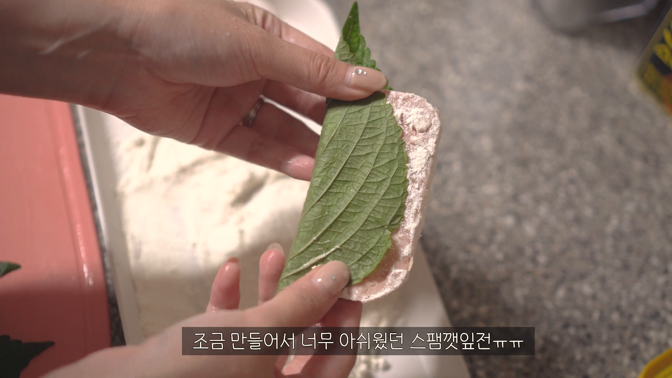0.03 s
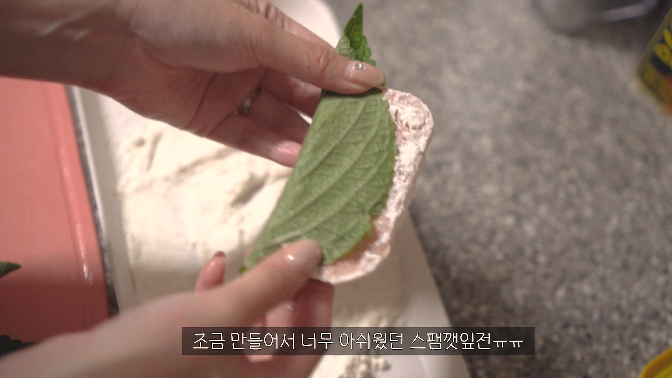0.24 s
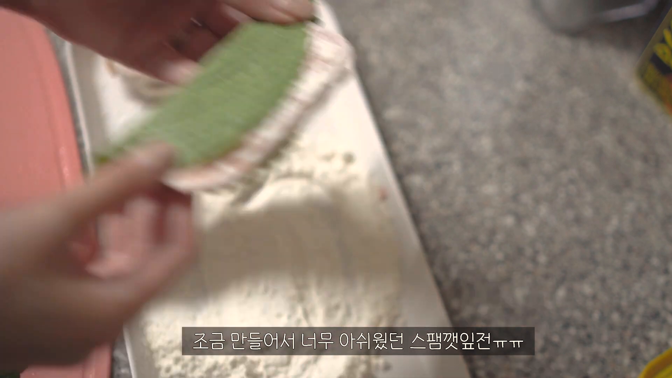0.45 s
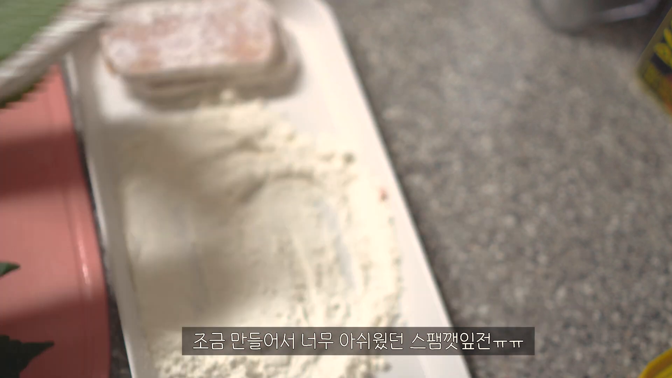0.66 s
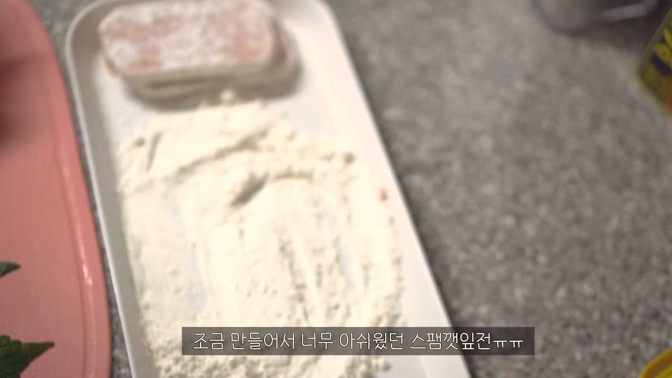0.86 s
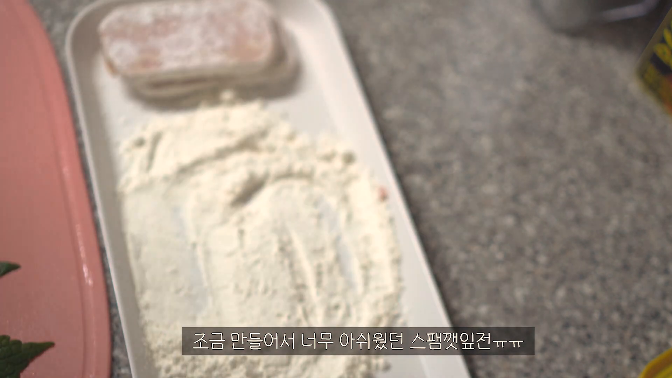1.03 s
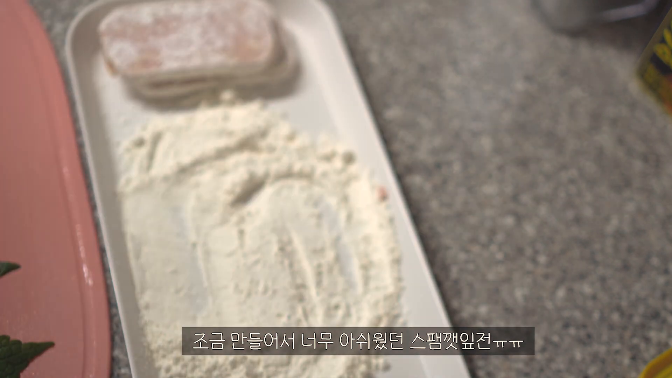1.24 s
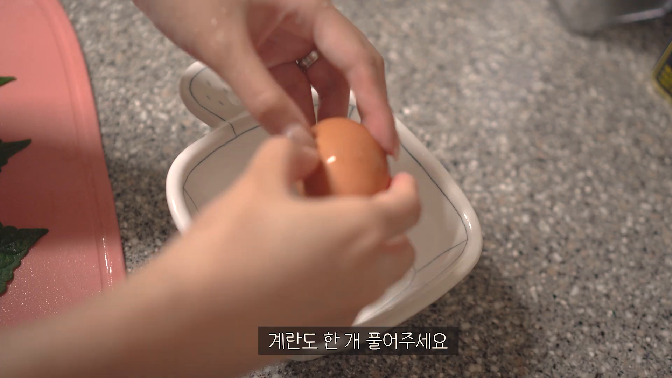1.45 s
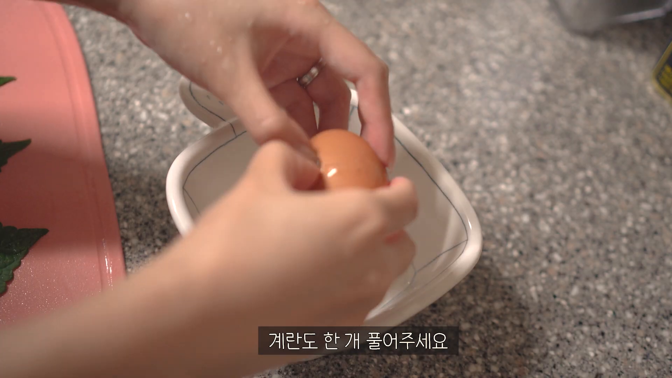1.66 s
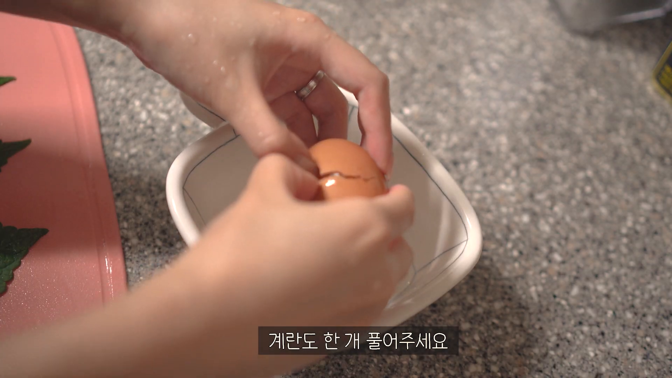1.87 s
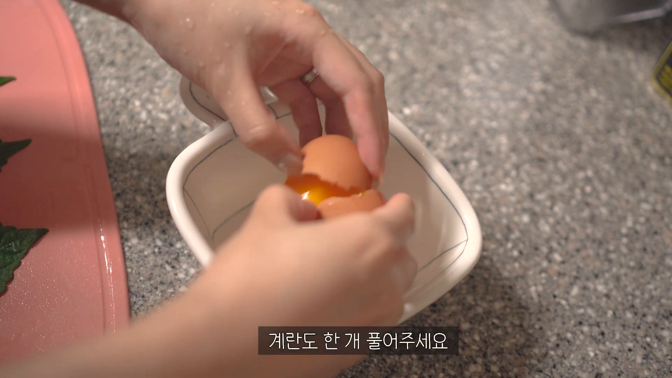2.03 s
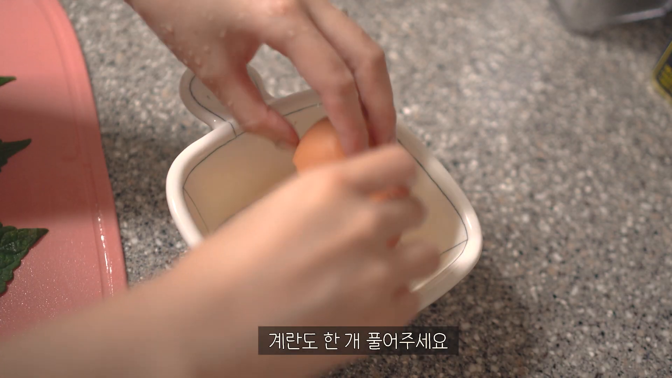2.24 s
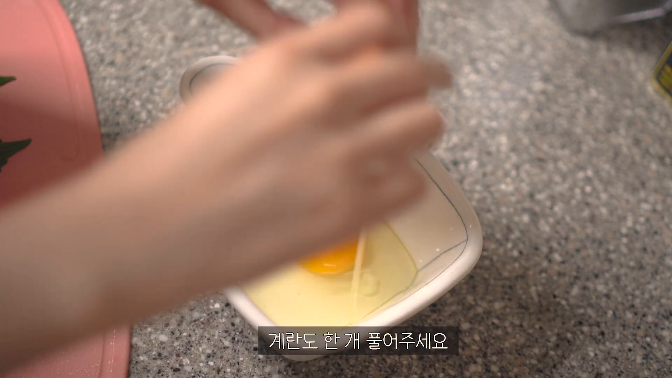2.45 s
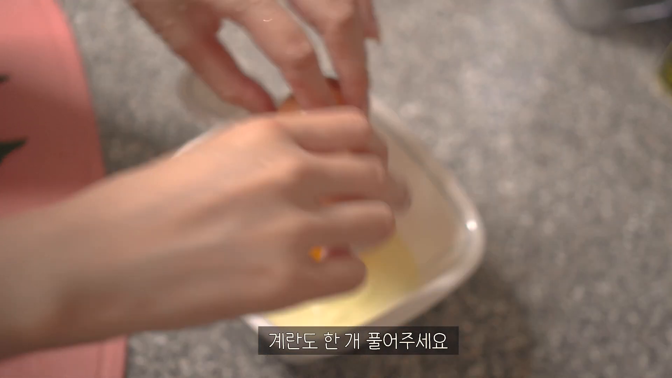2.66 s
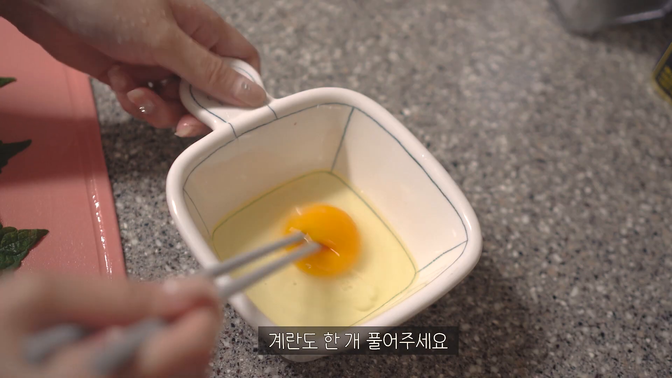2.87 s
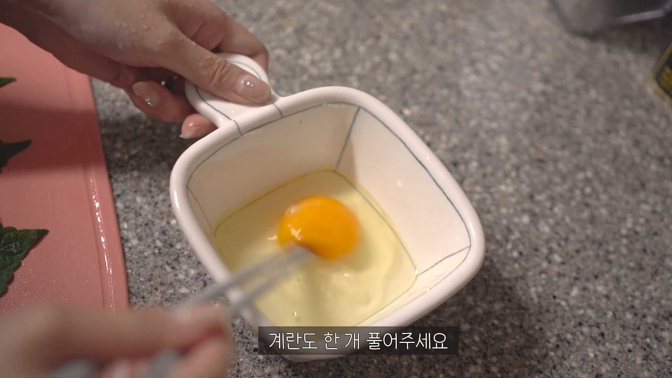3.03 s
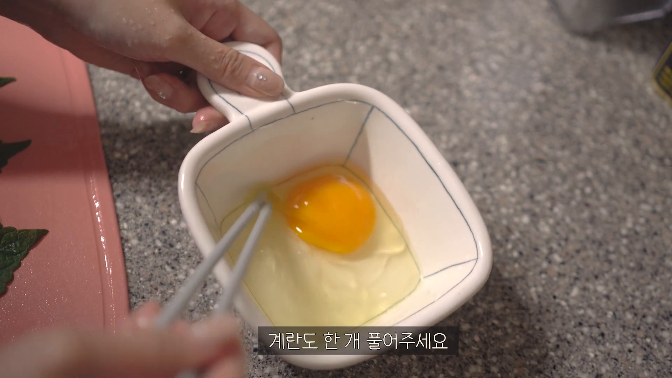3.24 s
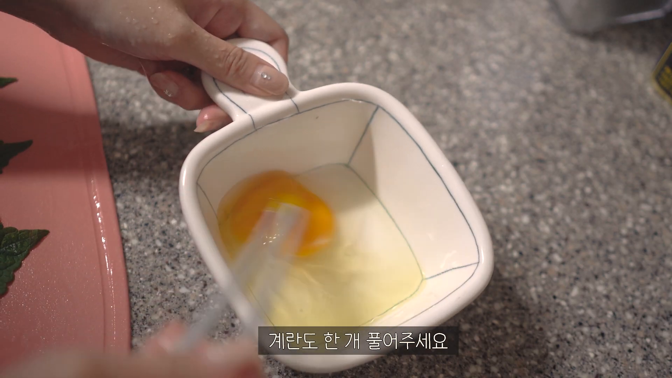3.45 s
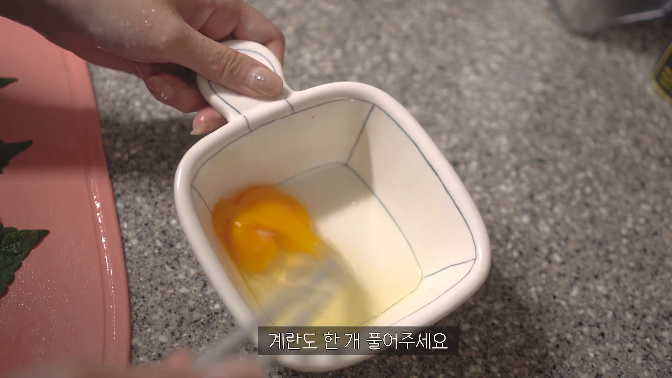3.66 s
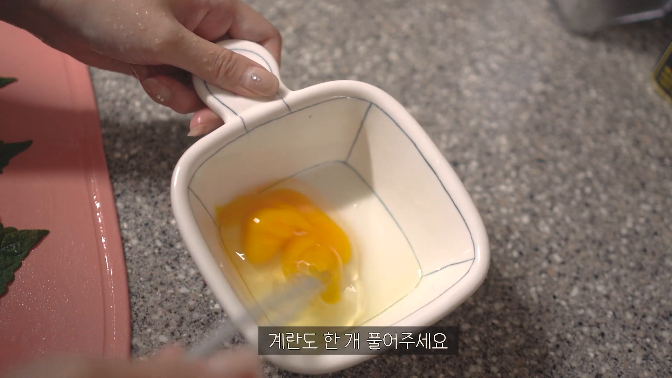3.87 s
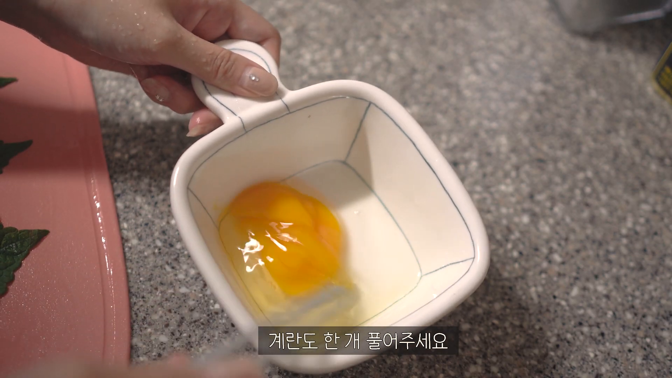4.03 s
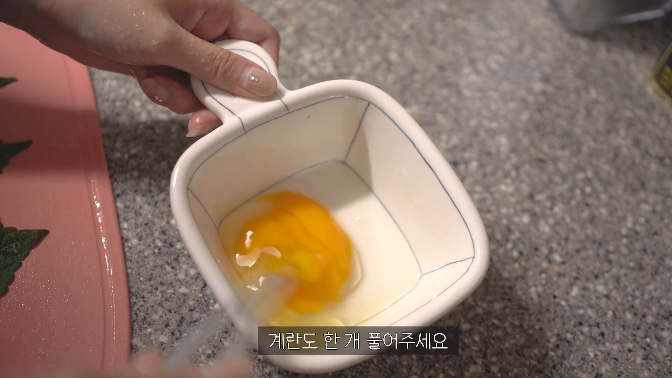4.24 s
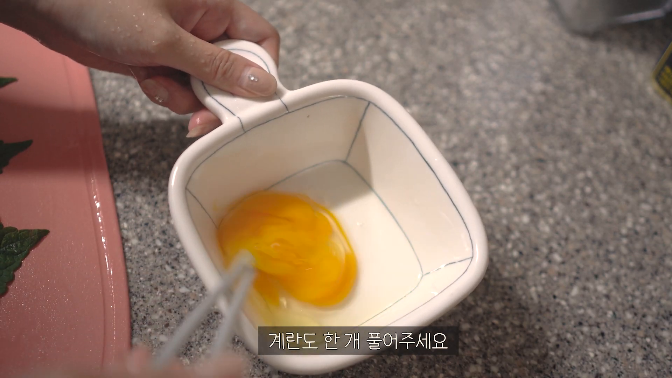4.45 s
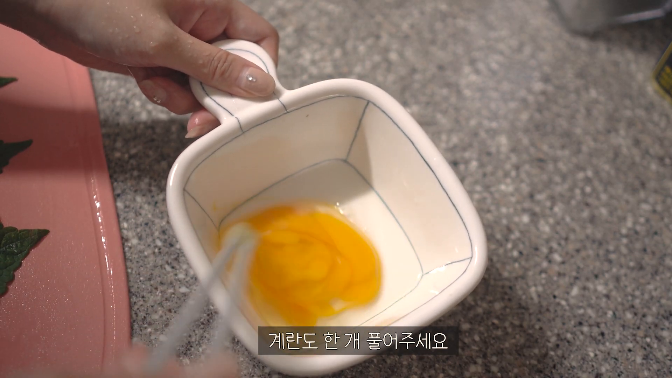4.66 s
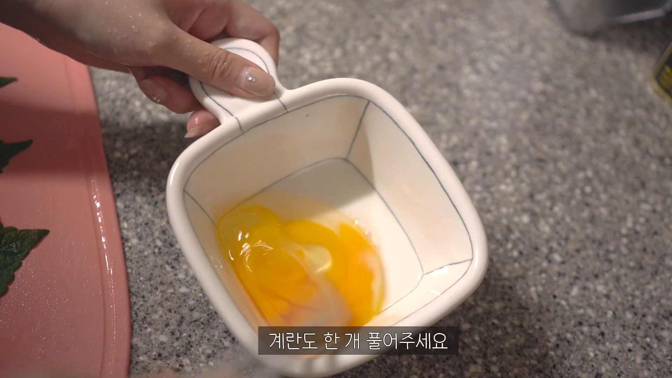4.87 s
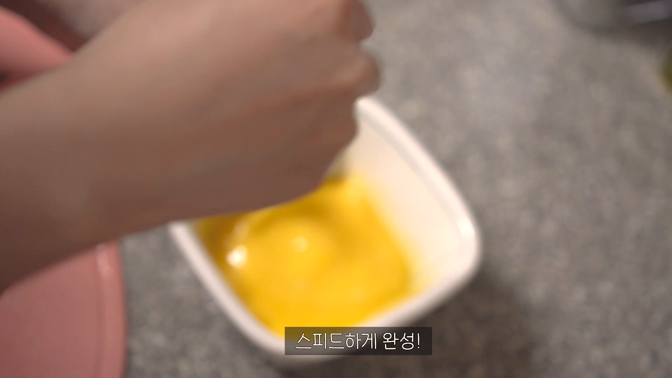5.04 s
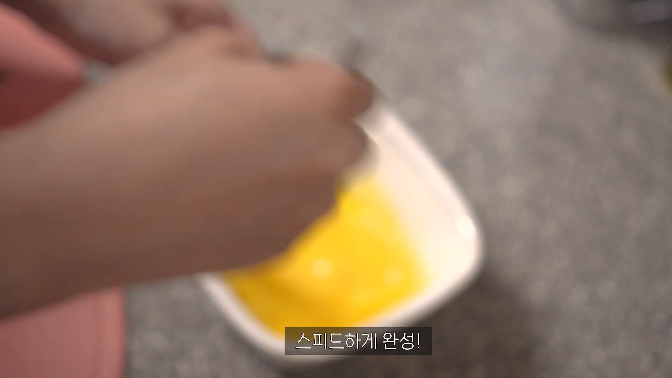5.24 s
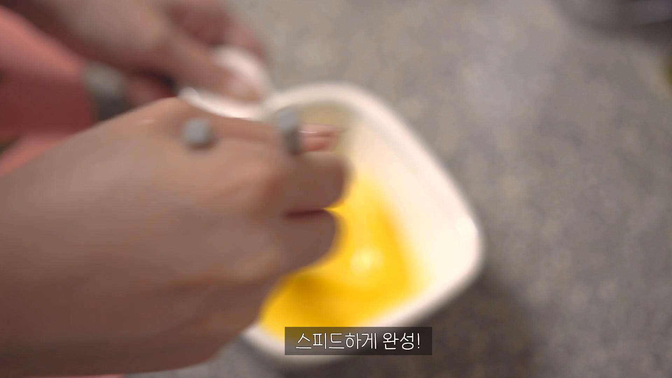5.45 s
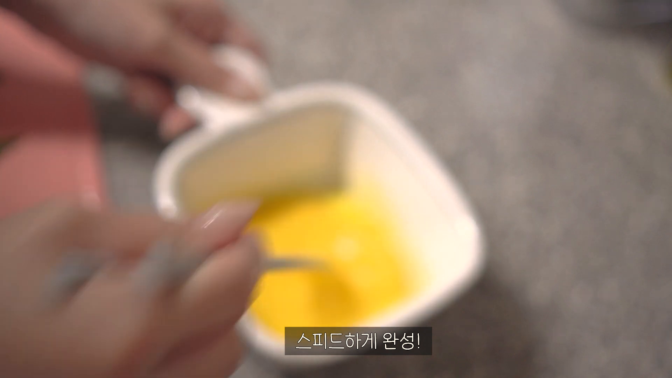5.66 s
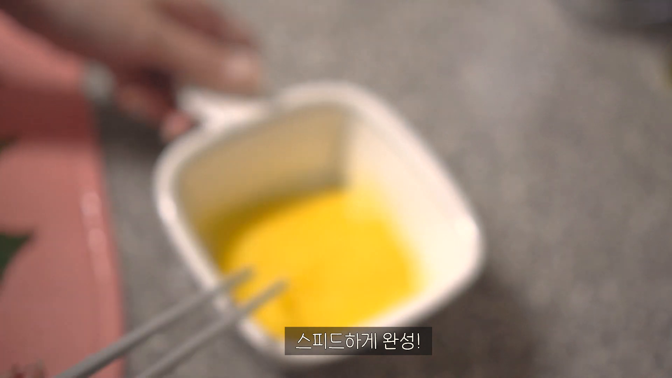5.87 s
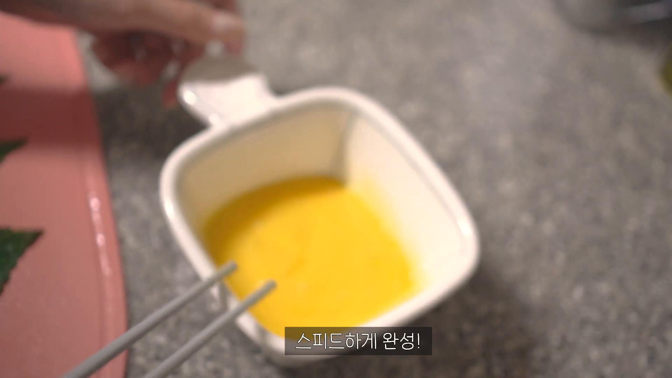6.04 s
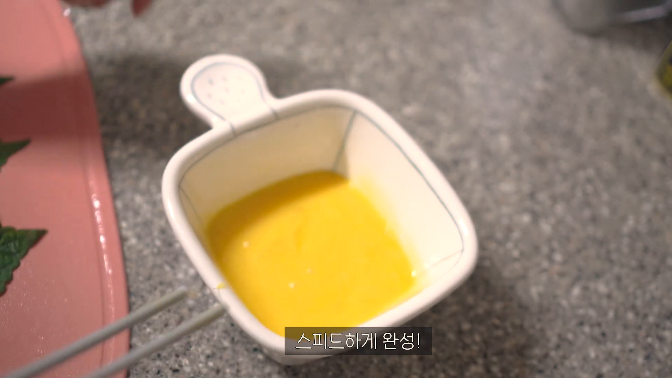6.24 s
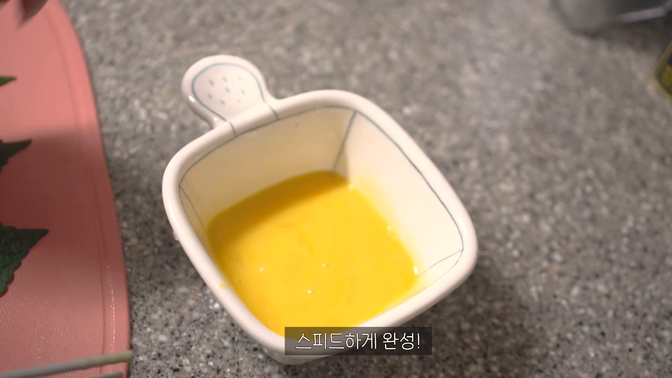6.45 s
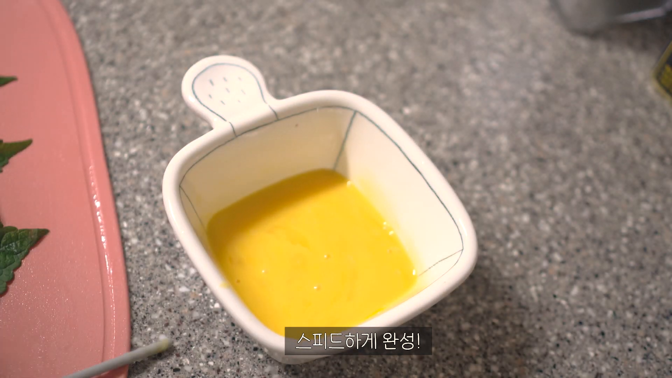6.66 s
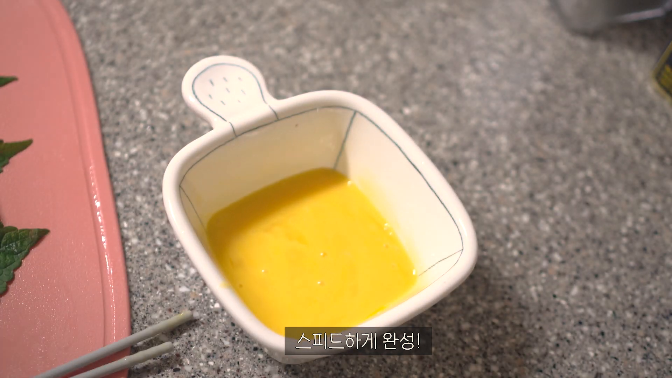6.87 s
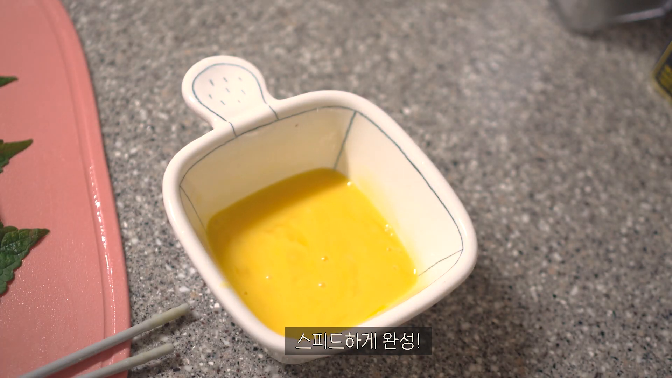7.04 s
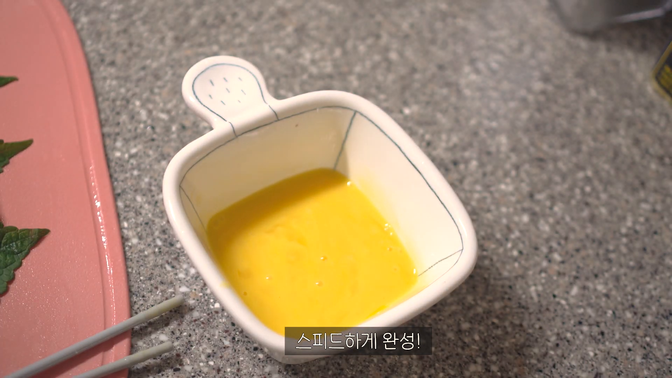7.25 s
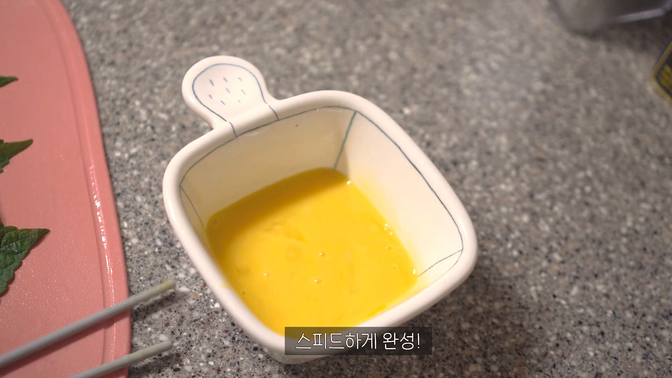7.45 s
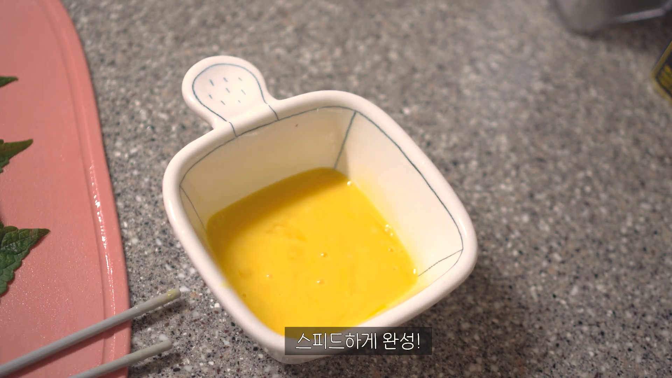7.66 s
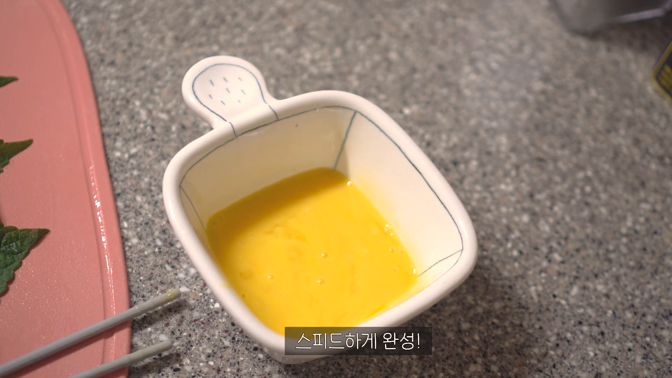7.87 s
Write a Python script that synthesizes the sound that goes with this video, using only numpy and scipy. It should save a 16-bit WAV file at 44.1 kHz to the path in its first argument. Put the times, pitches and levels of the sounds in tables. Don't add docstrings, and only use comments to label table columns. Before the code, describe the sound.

Close stereo in a small hard kitchen with a steady fan. Light taps on a floured tray, then an eggshell snaps sharply and crackles apart. An abrupt cut brings chopsticks beating egg in a ceramic dish, which knocks dully on the hollow counter with thin clinks and wet smacks. Drips follow, the dish is set down rocking, and sticks clatter onto stone.

```python
import sys
import numpy as np
from scipy import signal
from scipy.io import wavfile
from scipy.ndimage import uniform_filter1d

SR = 44100
rng = np.random.default_rng(int(sys.argv[2]) if len(sys.argv) > 2 else 0)


def nominal_scale(level):
    x = np.asarray(level, float) / 20
    return 10 ** x


def bounce(signal):
    frames = np.transpose(np.atleast_2d(signal))
    limited = np.clip(frames, -1, 1)
    pcm = np.round(limited * 32767).astype(np.int16)
    wavfile.write(sys.argv[1], SR, pcm)


N = 348717

# (frequency [Hz], density [dB per Hz])
FAN_SPECTRUM = [(15, -84), (25, -48), (288, -7.5), (524, -6), (1090, -3), (1220, -7), (1640, 0), (2210, -7),
                (2670, -7.5), (3810, -9), (15200, -17), (16500, -25)]
# (frequency [Hz], width [Hz], lift [dB])
DUCT_HUMPS = [(319, 35, 4.5), (1070, 420, 9), (1600, 97, -4), (2450, 360, 8.5)]
# (time [s], level [dB])
FAN_LEVEL = [(0, -59), (1.38, -57.5), (1.40, -59), (2.8, -55), (2.83, -58.5), (5.6, -57), (6.5, -58),
             (7.92, -56)]
# (frequency [Hz], likeness [0-1])
FAN_LIKENESS = [(60, 0.98), (180, 1), (550, 0.07), (1650, 0.24), (4970, 0.11), (15000, 0.24)]
# (start [s], duct humps [factor], bass [dB])
SCENES = [
    (0, 0.5, 6),
    (1.39, 0.9, 0),
    (2.81, 1.05, 15),
    (5.9, 1.13, 9),
]
# (start [s], length [s], frequency [Hz], lift [dB])
DISH_HOLLOW = [
    (5.42, .2, 1200, 9),
    (5.62, .32, 1620, 13),
    (5.66, .26, 1200, 5),
    (5.73, .12, 2600, 5),
    (7.78, .2, 1600, 11),
    (7.76, .2, 2500, 5),
]
HOLLOW_WIDTH_HZ = 150
# (frequency [Hz], t60 [s])
ROOM_DECAY = [(200, 0.52), (530, 0.25), (1400, 0.18), (3700, 0.18), (9700, 0.19), (16000, 0.13)]
# (time [s], level [dB])
CRUMBS = [
    [(1.94, -67), (1.98, -48), (2.05, -52), (2.24, -52), (2.35, -52), (2.4, -56), (2.49, -52), (2.54, -50),
     (2.58, -58), (2.65, -54), (2.72, -54), (2.81, -60)],
    [(3.55, -63), (3.706, -67.5), (4.3, -64), (4.7, -58), (4.82, -62), (5.2, -66)],
]
# (time [s], level [dB], bright edge [Hz], chatter [s])
STICKS_LAID = [
    (5.001, -35, 2040, .008),
    (6.615, -27, 1510, 0.012),
    (6.791, -31, 2100, 0.0088),
    (6.835, -14.5, 3400, 0.012),
    (6.846, -23, 4300, .012),
    (6.881, -17.5, 2800, 0.014),
]
# (time [s], first mode [dB], second re first [dB], third re first [dB])
CLINKS = [(2.9312, -61, -18, -15), (3.112, -48, -29, -13), (3.2934, -43.5, -22, -28),
          (3.609, -45.5, 4.5, 4), (3.7978, -63, -5, 0), (3.973, -55, -14, -8), (4.0357, -41.5, -13, -2.5),
          (4.133, -54, -17, -8), (4.1924, -54, -15, -18), (4.3064, -59, -16, -5), (4.366, -50.5, -12, -24),
          (4.5346, -60.5, -6, -5), (4.677, -59, -6, 12.5)]
# (frequency [Hz], level [dB], t60 [s])
STICK_MODES = [(4581, 0, 0.06), (5820, 4, 0.037), (6030, 13, 0.02), (8170, 0, 0.023), (8400, -2, .05)]
# (time [s], spray [dB], spray centre
# [Hz], bubble [Hz], bubble [dB])
WET_SMACKS = [(3.550, -19.5, 3240, 1212, -17.5), (3.551, -23.5, 11900, 2320, -24),
              (3.61, -31.5, 8800, 6250, -48.5), (3.697, -22, 5000, 4900, -38), (3.785, -39.5, 7000, 2500, -58),
              (3.808, -35, 2960, 3110, -39.5), (3.866, -31, 4500, 1136, -24), (4.026, -38, 4030, 1110, -33),
              (4.037, -24, 5500, 2780, -31), (4.192, -42, 4480, 1060, -29.5), (4.211, -44, 8500, 3770, -53),
              (4.329, -44, 4000, 3380, -43.5), (4.368, -41, 4000, 1600, -37.5), (4.483, -37, 7000, 4100, -47),
              (4.654, -37, 5400, 5100, -42), (4.676, -41, 9000, 2450, -38.5), (4.727, -39, 5860, 5620, -43.5),
              (4.785, -40, 4230, 1230, -40), (4.875, -41, 8900, 7960, -44.5), (5.070, -39, 6000, 4100, -45.5),
              (5.333, -43.5, 13000, 13000, -50), (5.380, -35, 12300, 5070, -56),
         (5.508, -25, 14400, 11100, -40.5), (5.601, -29, 3470, 1550, -22), (5.622, -30, 14000, 5820, -46),
         (5.749, -29.5, 13000, 11900, -48), (6.615, -39, 7000, 1070, -29.5), (6.790, -49, 4000, 2400, -55),
         (6.839, -53, 7000, 2300, -30), (6.976, -37.5, 12000, 11000, -47), (7.443, -37.5, 4270, 2000, -47)]
BUBBLE_T60_S, YOLK_T60_S = 0.045, 0.16

# (frequency [Hz], density [dB per Hz])
SNAP_SPECTRUM = [(240, -64), (400, -35), (1050, -27), (1620, -34.5), (1960, -19), (2250, -19.5),
                 (12500, -18), (15500, -21), (17000, -45)]
# (time [s], snap level [dB])
HANDLING = [
    (0.7876, -35),
    (0.915, -51),
    (0.9264, -45),
    (0.954, -45),
    (0.9644, -45),
    (1.3828, -44),
]
TRAY_HZ, TRAY_DB, TRAY_TILT_DB = 2000, -19, -3
# (time [s], snap [dB], ring [Hz], ring re
# snap [dB])
SHELL_SNAPS = [(1.484, -50, 3380, -14), (1.5336, -36, 2200, -4), (1.5957, -29.5, 1820, -24),
               (1.6337, -37, 2600, -13), (1.6495, -11, 2090, -30), (1.656, -13.5, 1964, -17.5),
               (1.8169, -26, 1730, -35), (1.8584, -35, 2230, -47), (1.8696, -27, 2450, -41),
               (1.9647, -47, 3330, 0), (1.9789, -33, 3300, -4), (1.9868, -4.5, 2960, -22),
               (2.0025, -7.5, 2300, -19), (2.0197, -19, 2610, -10),
               (2.0864, -28, 3720, -13), (2.0963, -36.5, 2000, -0.5), (2.1136, -27.5, 1977, 6.5),
           (2.1284, -53, 2010, 21), (2.2177, -19.5, 3345, -7.5), (2.2746, -38, 2030, -3),
           (2.3433, -41.5, 1790, 4.5), (2.387, -39.5, 3020, -1), (2.4191, -30, 2110, -6),
           (2.462, -30.5, 2960, 1), (2.492, -26, 2090, -4.5), (2.504, -26, 2160, -5.5),
           (2.5177, -25, 2160, -11), (2.6013, -26, 3210, -28), (2.648, -24, 1970, -16),
           (2.6637, -22.5, 1930, -9), (2.688, -38.5, 3150, -1), (2.7748, -30, 2165, -8),
           (2.804, -45, 2450, -4)]
CRACKLE_S, CRACKLE_S_PER_DB = 0.003, 0.00018
EVEN_RING_DB, DULL_PER_DB = -18, 0.11
CUT_S = 2.812

# (frequency [Hz], level [dB], t60 [s])
HOLLOW_MODES = [(118, -9, .07), (194.3, 0, .14), (250, -7, .08), (300, -4, .1), (358, -1, .17)]
# (frequency [Hz], level [dB], t60 [s])
LOW_MODES = [(420, -2, .1), (469, 6, .14), (510, 3, .15), (556, 4, .15), (620, 3, .15), (686, 5, .17)]
# (frequency [Hz], level [dB], t60 [s])
HELD_MODES = [(805, -8, .12), (858, -6, .2), (905, -2, .13), (1060, 5, .1), (1110, 5, .1), (1220, 0, .1),
              (1277, -4, .1), (1394, -2, .2), (1466, -4, .2)]
# (frequency [Hz], level [dB], t60 [s])
FREED_MODES = [(856, -2, .2), (910, -1, .17), (1040, -7, .15), (1087, -5, .2), (1220, -5, .15),
               (1281, -8, .17), (1390, -6, .17), (1470, -1, .17), (1540, -9, .2), (1685, -9, .2),
               (1781, -2, .1), (1975, -16, .15)]
# (frequency [Hz], level [dB])
CLACK_SPECTRUM = [(1000, -53), (1700, 4), (2500, -4.5), (3500, -25), (6000, -32), (16000, -44.5)]
# (time [s], level [dB], sharpness [dB], bass [dB])
WHISK = [(2.928, -43, -6, -4), (2.993, -24, 0, -8), (3.03, -32, -3, -4), (3.11, -28, -13, -14),
         (3.168, -42, -7, -8), (3.292, -32, -10, -18), (3.457, -38, -13, -12), (3.47, -34, -15, -14),
         (3.611, -33, -10, -12), (3.683, -43, 4, -8), (3.707, -45, 3, -9), (3.797, -32, -11, -12),
         (3.839, -42, 3, -9), (3.97, -27, -13, -16), (4.022, -36, -6, -12), (4.129, -27, -9, -14),
         (4.191, -32, -8, -14), (4.307, -31, -13, -14), (4.362, -35, -2, -12), (4.485, -23, -12, -16),
         (4.529, -38, 0, -12), (4.658, -32, -14, -12), (4.7, -33, -8, -14), (4.832, -30, -11, -9),
         (4.875, -39, -8, -9), (5.013, -30, -16, -12), (5.05, -36, -12, -8), (5.11, -39, -8, -3),
         (5.169, -39, -6, -4), (5.366, -40, -7, -1)]
# (time
# [s], level [dB], sharpness [dB], bass [dB], rattle [s])
SET_DOWN = [(5.92, -23, 5, -11, .008), (5.929, -24, 4, -11, .025), (5.96, -28, 0, -8, .03),
            (6.083, -27, 3, -9, .008), (6.093, -25, 7, -13, .012), (6.132, -20, -1, -15, .02),
            (6.22, -40, 2, -8, .03), (6.616, -32, -7, -14, .015), (6.669, -36, -5, -9, .009),
            (6.746, -42, -9, -9, .012), (6.837, -34, -9, -14, .015), (6.882, -33, -9, -14, .02),
            (7.061, -43, -4, 0, .029), (7.636, -40, 0, -12, .013)]
WHISK_RATTLE_S = 0.015
WHISK_LASTING, SET_LASTING = 0.48, 0.45
# (at sharpness 0 [dB], growth [dB per dB of sharpness])
WHISK_CLACK, SET_CLACK = (-13, 1.05), (-16, 0.3)
# (time [s], frequency [Hz], level [dB], t60 [s])
SHELL_RINGS = [(1.650, 1058, -42, .078), (2.006, 1014, -52, .09), (2.114, 1036, -37.5, .075),
               (2.116, 830, -38, .025), (2.128, 1036, -35.5, .072), (2.218, 2030, -24.5, .023),
               (2.328, 1800, -46, .03), (2.458, 3600, -38, .03), (2.505, 3100, -38, .06),
               (2.519, 2100, -32, .04), (2.642, 2000, -44, .04), (2.7, 3080, -47, .07)]
# (time [s], frequency [Hz], level [dB], t60
# [s])
RUB_RINGS = [
    (3.01, 1394, -36, .2),
    (3.706, 860, -34, .045),
    (4.536, 1460, -43, .06),
    (4.706, 1440, -44, .06),
    (4.878, 1450, -49, .05),
    (5.048, 1453, -50, .05),
    (5.112, 358, -50, .2),
    (5.18, 345, -50, .15),
    (5.386, 350, -49, .12),
]
# (time [s], frequency [Hz], level [dB], t60 [s])
DISH_RINGS = [(5.919, 1785, -24, .08), (5.922, 5150, -50, .12), (5.922, 3731, -49, .16),
              (5.93, 3962, -54, .2), (5.931, 1750, -18.5, .034), (5.93, 2729, -39.5, .12),
              (5.939, 1478, -30, .14), (6.085, 1781, -30, .073), (6.086, 2730, -44, .08),
              (6.094, 2730, -38, .1), (6.094, 1475, -25, .08), (6.095, 1790, -18, .039),
              (6.093, 3965, -42, .17), (6.094, 3731, -48, .17), (6.085, 5140, -54, .09),
              (6.133, 5130, -62, .2), (6.222, 5130, -62, .05), (6.133, 1482, -24, .097),
              (6.227, 1760, -34.5, .033)]
SHELL_SWELL_S, RUB_SWELL_S, DISH_SWELL_S = 0.001, 0.008, 0.0025


def read(points, hz):
    f, value = np.transpose(points)
    return np.interp(np.log(hz + 1), np.log(f + 1), value)


def topped(x):
    return x / (abs(x).max() + 1e-12)


def add(mix, s, sound, pan_db=0):
    part = mix[:, round(s * SR):][:, :len(sound)]
    part += sound[:part.shape[1]] * nominal_scale(np.array([[pan_db / 2], [-pan_db / 2]]))


def ring(modes, spread_db, lasting=1, rise_s=0.00029, detune=0.0099):
    hz, db, t60 = np.transpose(modes)[:, :, None]
    t = np.arange(int(min(6000, lasting * t60.max() * SR))) / SR
    sign_luck, level_luck, pitch_luck = rng.standard_normal((3, len(modes), 1))
    decay = np.exp(-np.log(1000) * t / (lasting * t60))
    fade = decay * (1 - np.exp(-t / rise_s)) * (1 - (t / t[-1]) ** 2)
    tones = np.sin(2 * np.pi * hz * (1 + detune * pitch_luck) * t)
    strengths = np.sign(sign_luck) * nominal_scale(db + spread_db * level_luck)
    return topped((strengths * fade * tones).sum(0))


def crowded(modes, count=8):
    low_hz, high_hz = 0.885 * modes[0][0], 1.12 * modes[-1][0]
    hz = low_hz + (high_hz - low_hz) * (np.arange(count) + rng.random(count)) / count
    db = -2 - 9 * np.maximum(np.log2(220 / hz), 0) - 50 * np.maximum(np.log2(hz / 1800), 0)
    return modes + [(f, level, .09) for f, level in zip(hz, db)]


def chatter(length_s, per_s, rebound):
    t = np.arange(4000) / SR
    touch = rng.standard_normal(len(t)) * (rng.random(len(t)) < per_s / SR)
    touch *= rebound * np.exp(-t / max(length_s, 1e-4))
    touch[0] = 1
    return touch


def colour(x, gain_db):
    size = 2048
    hz = abs(np.fft.fftfreq(size, 1 / SR))
    log_gain = np.log(nominal_scale(np.maximum(gain_db(hz), -80)))
    taps = np.fft.ifft(np.exp(log_gain - 1j * signal.hilbert(log_gain).imag)).real
    return signal.fftconvolve(x, taps[:size // 2])


def fan():
    frames, hz = N // 256 + 5, np.fft.rfftfreq(1024, 1 / SR)
    a, b, c, d, patches = rng.standard_normal((frames, 513, 5)).T
    patches = uniform_filter1d(uniform_filter1d(patches, 6, 0), 14, 1)
    t = np.arange(frames) * 256 / SR
    start, humps, bass_db = np.transpose(SCENES)
    which = np.searchsorted(start[1:], t)
    level_db = np.interp(t, *np.transpose(FAN_LEVEL))
    hump_db = sum(db / (1 + (2 * (hz - f) / width) ** 2) for f, width, db in DUCT_HUMPS)
    field_db = read(FAN_SPECTRUM, hz)[:, None] + np.outer(hump_db, humps[which])
    field_db += np.outer(1 / (1 + (hz / 300) ** 2), bass_db[which])
    field_db -= 10 * np.log10(np.mean(nominal_scale(read(FAN_SPECTRUM, hz)) ** 2))
    for s, length_s, f, db in DISH_HOLLOW:
        band = 1 / (1 + (2 * (hz - f) / HOLLOW_WIDTH_HZ) ** 2)
        passing = np.sin(np.pi * np.clip((t - s) / length_s, 0, 1)) ** .5
        field_db += db * np.outer(band, passing)
    same = np.clip(read(FAN_LIKENESS, hz), -1, 1)[:, None]
    left = a + 1j * b
    right = same * left + np.sqrt(1 - same ** 2) * (c + 1j * d)
    wavering_db = 1.45 * patches / patches.std()
    z = np.array([left, right]) * nominal_scale(field_db + level_db + wavering_db - 28)
    return signal.istft(z, nperseg=1024, noverlap=768)[1][:, :N]


def echoes():
    size = SR // 3
    taps = np.zeros((2, size))
    at = np.arange(60, size - 20, 20) + rng.integers(0, 20, (2, (size - 61) // 20))
    np.put_along_axis(taps, at, rng.choice([-1., 1.], at.shape), 1)
    hz, t, z = signal.stft(taps, SR, nperseg=256)
    alike = np.clip(.02 + 0.93 / (1 + (hz / 1200) ** 3), 0, 1)[:, None]
    z[1] = alike * z[0] + np.sqrt(1 - alike ** 2) * z[1]
    decay = nominal_scale(-60 * t / read(ROOM_DECAY, hz)[:, None])
    tail = signal.istft(z * decay, SR, nperseg=256)[1]
    return tail / np.linalg.norm(tail[0])


def room(x):
    turn = 2 * np.pi * 2.3 * np.arange(N) / SR
    wet = np.zeros((2, N))
    for k in range(3):
        share = np.sqrt(2 / 3) * np.cos(turn + k * np.pi / 3)
        wet += signal.oaconvolve((share * x.mean(0))[None], echoes(), axes=1)[:, :N]
    return wet


def crumbs():
    out, t = np.zeros((2, N)), np.arange(300) / SR
    sizes = nominal_scale(7 * np.minimum(rng.exponential(1, (2, N)), 4))
    draw = rng.random((2, N)) * SR // 70
    for k, hz in enumerate(np.geomspace(1500, 7000, 8)):
        size = sizes * (draw == k)
        grain = np.sin(2 * np.pi * hz * t) * t * hz * np.exp(-t * hz / 2.1)
        out += signal.oaconvolve(size + .6 * size[::-1], grain[None], axes=1)[:, :N]
    level = 0
    for rows in CRUMBS:
        level = level + nominal_scale(np.interp(np.arange(N) / SR, *np.transpose(rows), left=-120, right=-120))
    return nominal_scale(-3) * level * out / out.std()


def sticks_laid():
    out = np.zeros((2, N))
    for s, db, edge_hz, chatter_s in STICKS_LAID:
        def tick_db(f):
            above = -13 * np.log10(1 + (f / edge_hz) ** 7)
            return above - 12 * np.log10(1 + (350 / (f + 1)) ** 4)
        add(out, s, nominal_scale(db) * topped(colour(chatter(chatter_s, 6000, 0.21), tick_db)))
    return out


def clinks():
    out = np.zeros((2, N))
    for s, db, second_db, third_db in CLINKS:
        blows = chatter(0.011, 390, 0.42)
        groups = ((STICK_MODES[:1], 0), (STICK_MODES[1:3], second_db + 10), (STICK_MODES[3:], third_db + 4))
        for modes, more_db in groups:
            steel = ring(modes, 1.3, 1.0, rise_s=0.00081, detune=0.012)
            add(out, s, nominal_scale(db + more_db) * topped(signal.fftconvolve(blows, steel)))
    return out


def smacks():
    out, t = np.zeros((2, N)), np.arange(6000) / SR
    for k, (s, spray_db, spray_hz, bubble_hz, bubble_db) in enumerate(WET_SMACKS):
        t60 = BUBBLE_T60_S if k else YOLK_T60_S
        spray = colour(chatter(0.0054, 4400, 0.31), lambda f: -9 * np.log2((f + 1) / spray_hz) ** 2)
        add(out, s, nominal_scale(spray_db) * topped(spray), 1.2)
        pop = nominal_scale(-60 * t / (0.33 * t60)) + 0.083 * nominal_scale(-60 * t / t60)
        rising_tone = np.sin(2 * np.pi * bubble_hz * t * (1 + 0.77 * t))
        bubble = pop * rising_tone * (1 - np.exp(-t / 0.00022))
        add(out, s, nominal_scale(bubble_db) * topped(signal.fftconvolve(chatter(0.0032, 300, 0.1), bubble)))
    return out


def cracks():
    out = np.zeros((2, N))
    snaps = [(*row, TRAY_HZ, TRAY_DB, TRAY_TILT_DB) for row in HANDLING]
    snaps += [(*row, DULL_PER_DB * (EVEN_RING_DB - row[-1])) for row in SHELL_SNAPS]
    for s, db, hz, ring_db, tilt_db in snaps:
        crackle_s = CRACKLE_S - CRACKLE_S_PER_DB * db
        snap = colour(chatter(crackle_s, 5000, 0.58),
                      lambda f: read(SNAP_SPECTRUM, f) + tilt_db * np.log2((f + 1) / 6000))
        add(out, s, nominal_scale(db) * topped(snap), 1.5)
        piece_modes = [(hz, 0, .022), (hz * .87, -6, .015), (hz * 1.17, -6, .015), (hz * 1.55, -12, .012)]
        piece = ring(piece_modes, 1.5)
        touches = chatter(crackle_s, 900, 0.21)
        add(out, s, nominal_scale(db + ring_db + 4.5) * topped(signal.fftconvolve(touches, piece)))
    return out


def lone_rings():
    out = np.zeros((2, N))
    sources = ((SHELL_RINGS, SHELL_SWELL_S), (RUB_RINGS, RUB_SWELL_S), (DISH_RINGS, DISH_SWELL_S))
    for rows, swell_s in sources:
        for s, hz, db, t60 in rows:
            pair = [(hz, 0, t60), (hz * 1.009, -11, t60)]
            add(out, s, nominal_scale(db) * ring(pair, 1.2, rise_s=swell_s, detune=0.0015))
    return out


def knocks():
    out = np.zeros((2, N))
    blows_given = [(*row, WHISK_RATTLE_S, WHISK_LASTING, HELD_MODES, *WHISK_CLACK) for row in WHISK]
    blows_given += [(*row, SET_LASTING, FREED_MODES, *SET_CLACK) for row in SET_DOWN]
    for s, level_db, sharp_db, bass_db, rattle_s, lasting, middle, clack_db, slope in blows_given:
        blows = chatter(rattle_s, 900, 0.3)
        for modes, db in ((HOLLOW_MODES, bass_db - 2), (LOW_MODES, 0.3), (middle, sharp_db + 3)):
            body = ring(crowded(modes, count=14), 1.5, lasting, rise_s=0.00052, detune=0.004)
            add(out, s, nominal_scale(level_db + db) * topped(signal.fftconvolve(blows, body)))
        clack = colour(blows + chatter(rattle_s, 4000, 0.46), lambda f: read(CLACK_SPECTRUM, f))
        add(out, s, nominal_scale(level_db + clack_db + slope * sharp_db + 8.5) * topped(clack))
    return out


def scene():
    shell = cracks()
    egg = smacks() + clinks() + crumbs()
    counter = knocks() + lone_rings() + sticks_laid()
    before_cut = np.arange(N) < CUT_S * SR
    shell = signal.sosfilt(signal.butter(2, 420, "high", fs=SR, output="sos"), shell)
    hits = nominal_scale(-1) * (egg + counter) + room(nominal_scale(-2) * egg + nominal_scale(-3.5) * counter)
    hits += before_cut * (nominal_scale(-1.5) * shell + room(nominal_scale(-2) * shell))
    return signal.sosfilt(signal.butter(3, 120, "high", fs=SR, output="sos"), hits) + fan()


def band_limit(x):
    return signal.sosfilt(signal.butter(12, 16970, fs=SR, output="sos"), x)


def record(dry):
    edge = signal.firwin(511, 15950, window=("kaiser", 3), fs=SR)
    below_edge = signal.oaconvolve(dry, edge[None], "same", axes=1)
    return band_limit(nominal_scale(-23) * dry + below_edge)


dry = scene()
out = record(dry)
bounce(out)
```